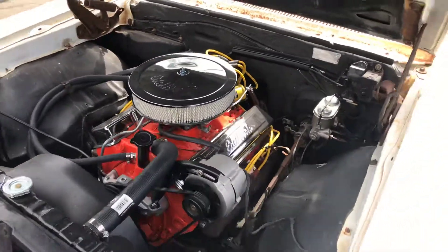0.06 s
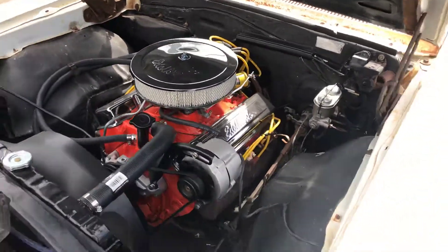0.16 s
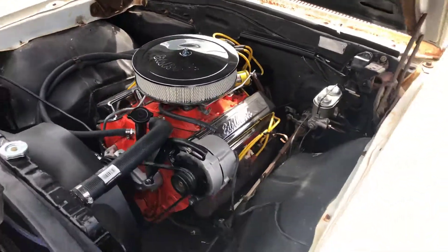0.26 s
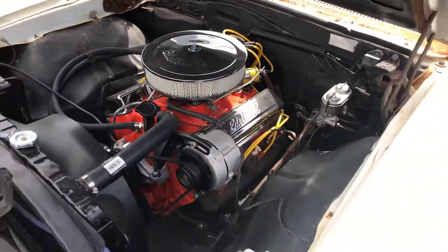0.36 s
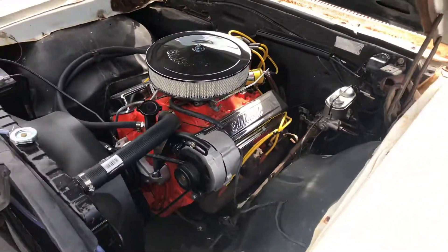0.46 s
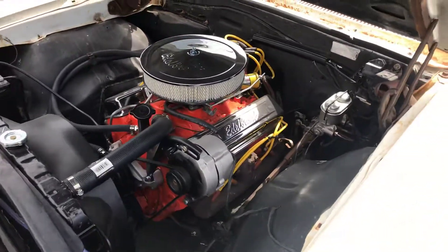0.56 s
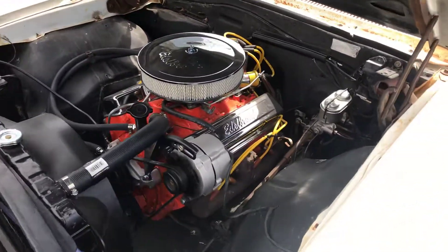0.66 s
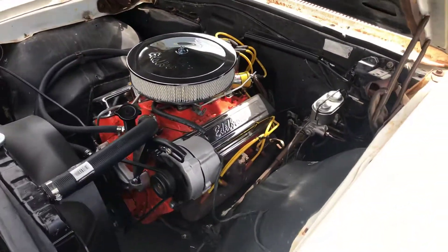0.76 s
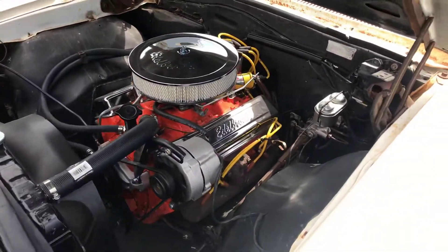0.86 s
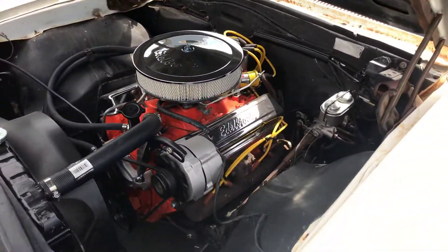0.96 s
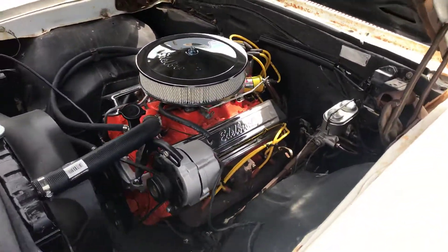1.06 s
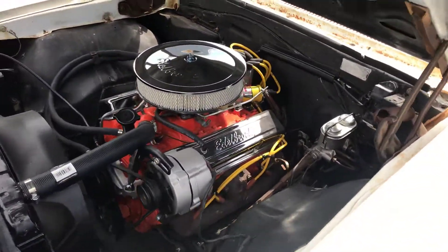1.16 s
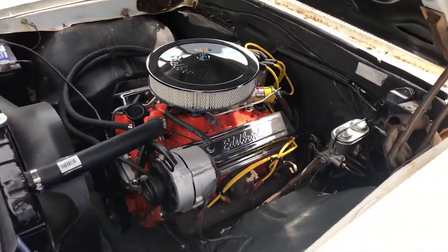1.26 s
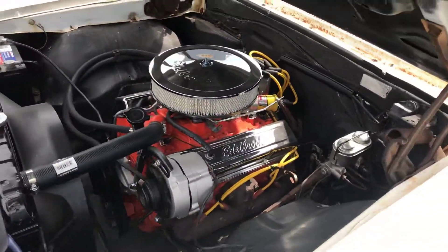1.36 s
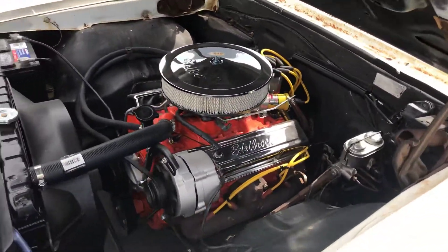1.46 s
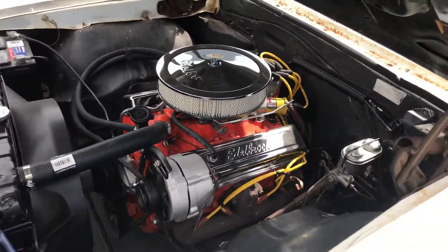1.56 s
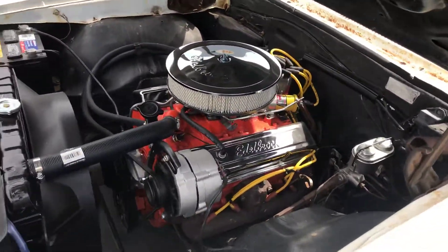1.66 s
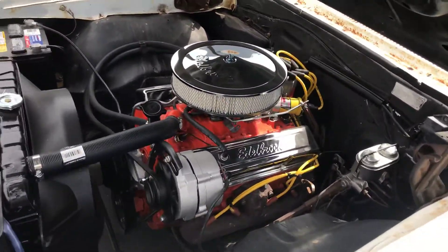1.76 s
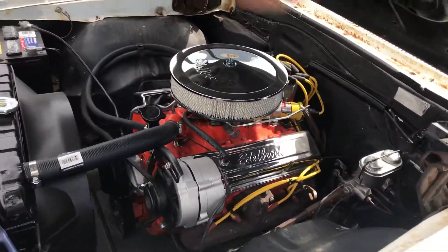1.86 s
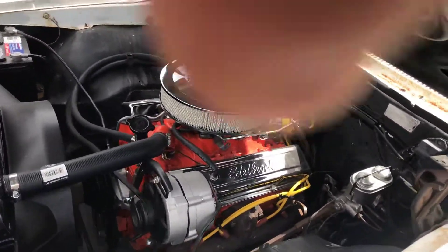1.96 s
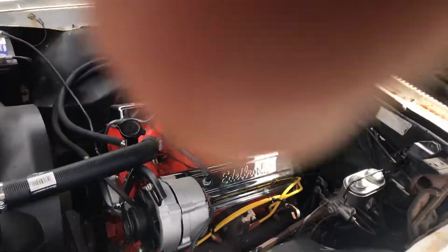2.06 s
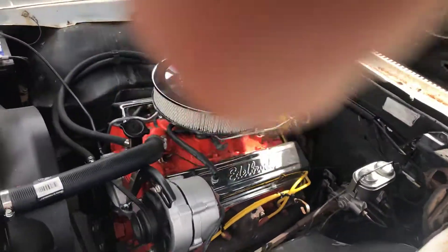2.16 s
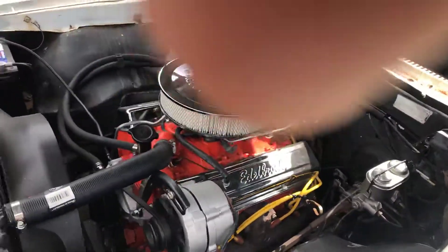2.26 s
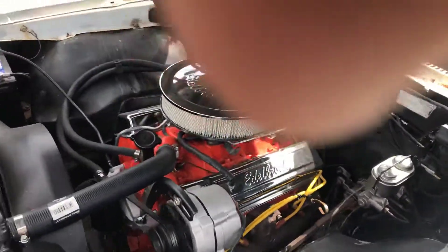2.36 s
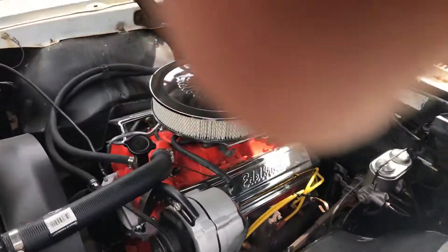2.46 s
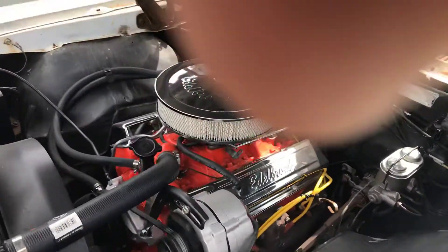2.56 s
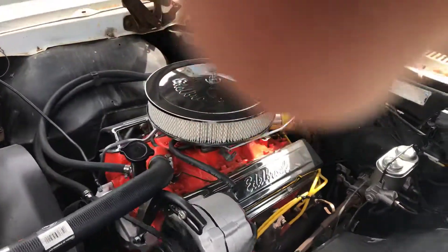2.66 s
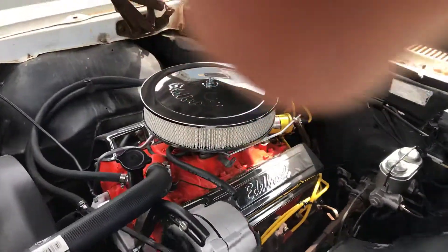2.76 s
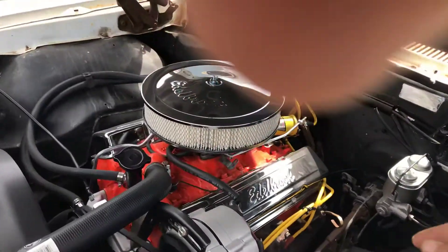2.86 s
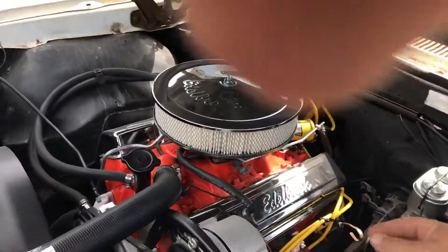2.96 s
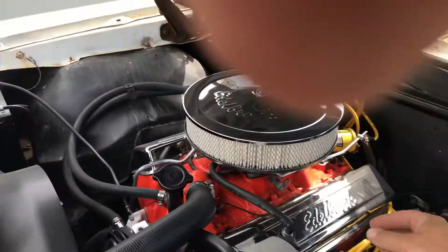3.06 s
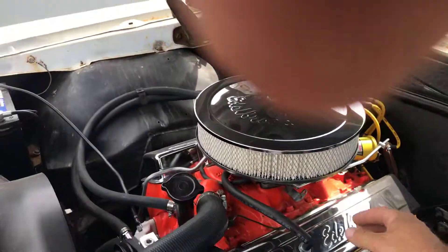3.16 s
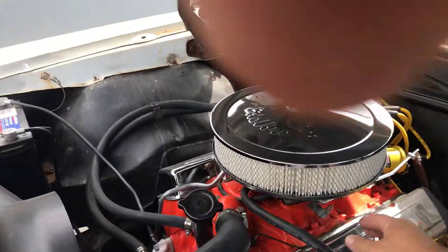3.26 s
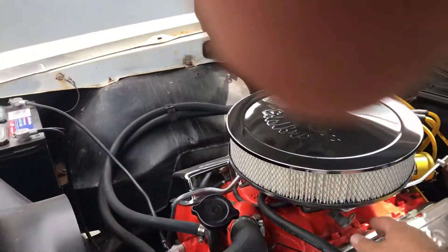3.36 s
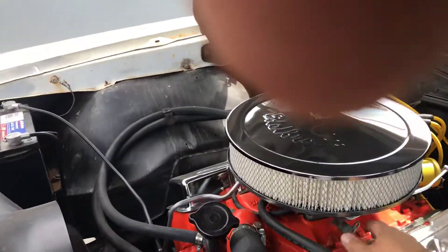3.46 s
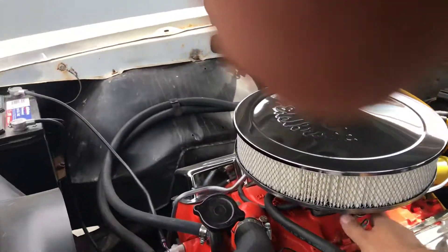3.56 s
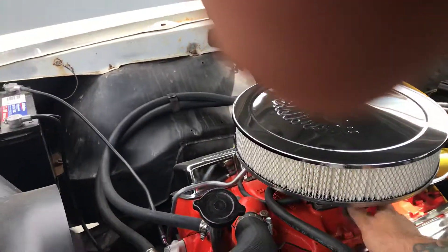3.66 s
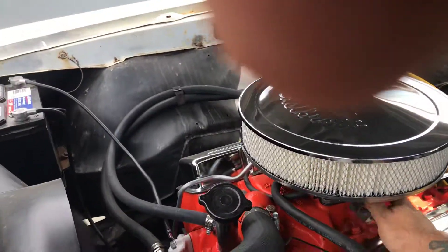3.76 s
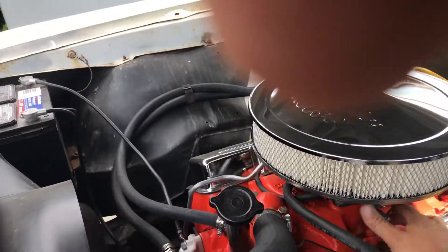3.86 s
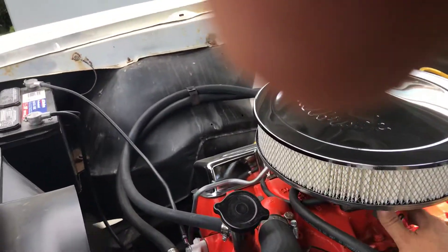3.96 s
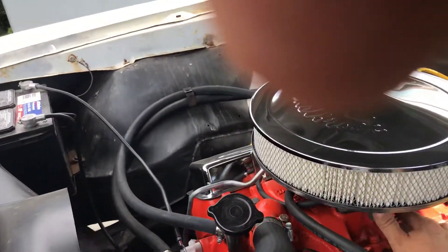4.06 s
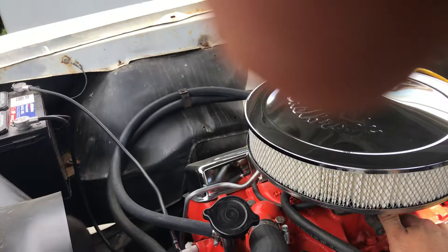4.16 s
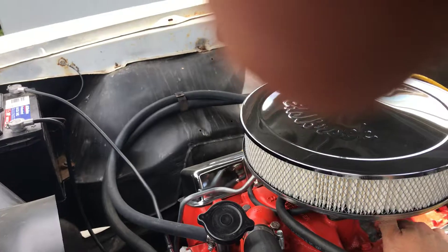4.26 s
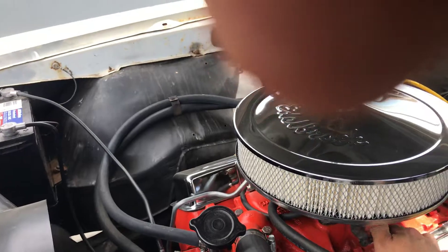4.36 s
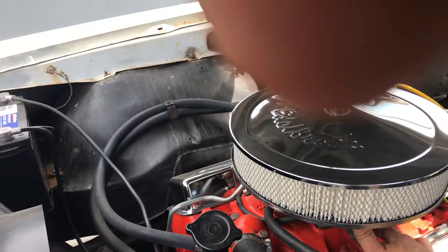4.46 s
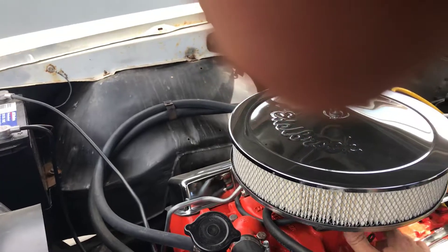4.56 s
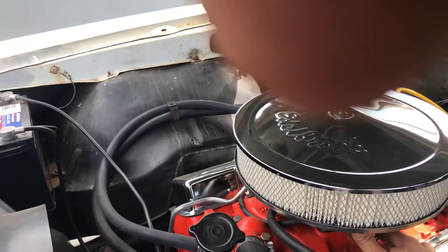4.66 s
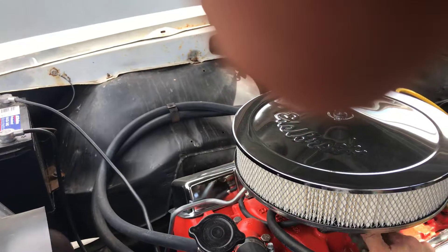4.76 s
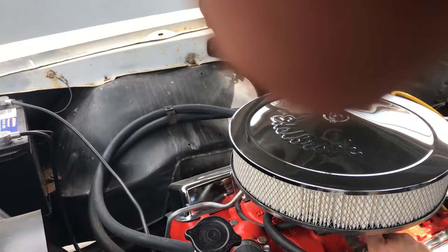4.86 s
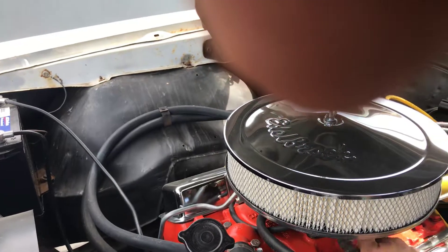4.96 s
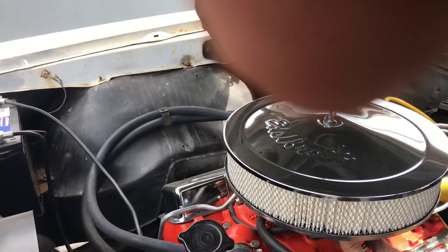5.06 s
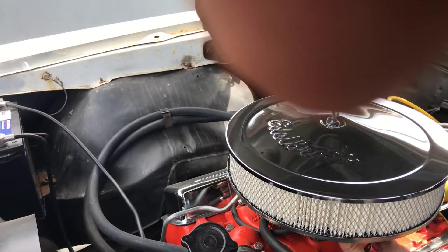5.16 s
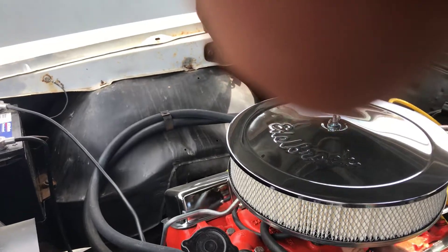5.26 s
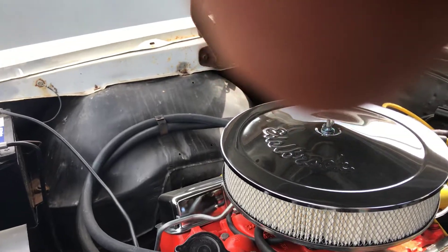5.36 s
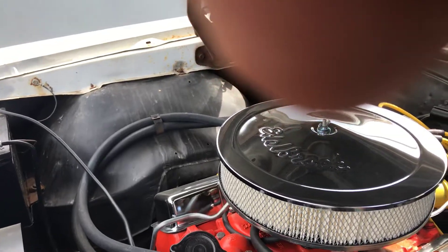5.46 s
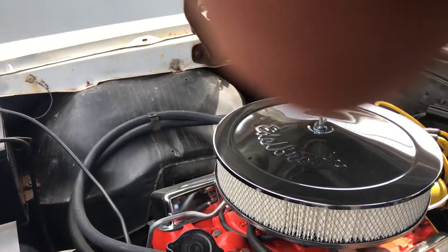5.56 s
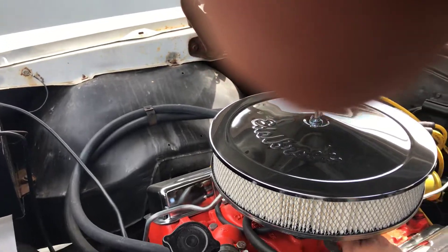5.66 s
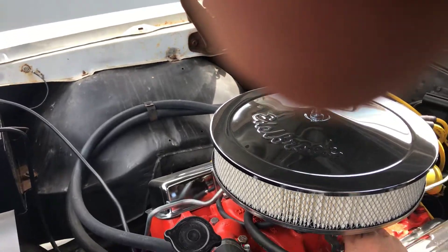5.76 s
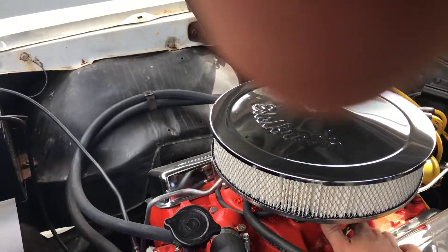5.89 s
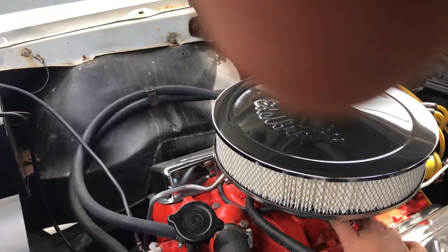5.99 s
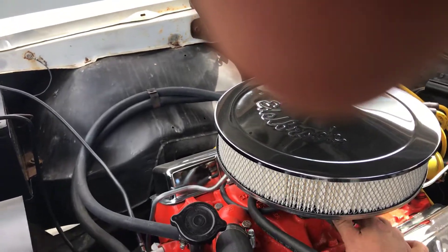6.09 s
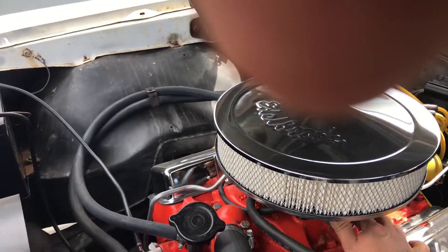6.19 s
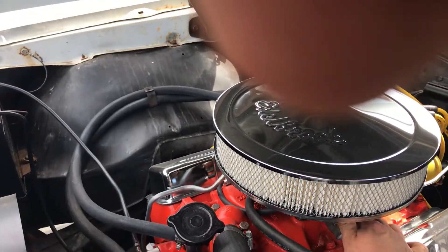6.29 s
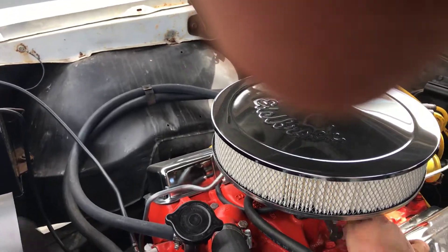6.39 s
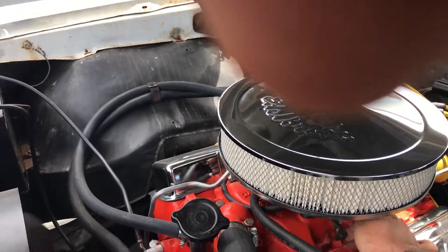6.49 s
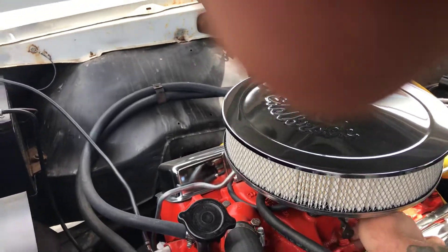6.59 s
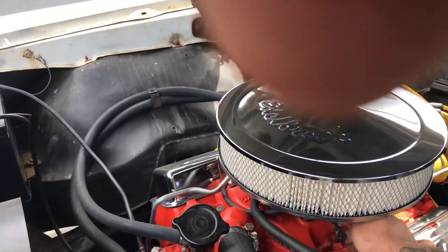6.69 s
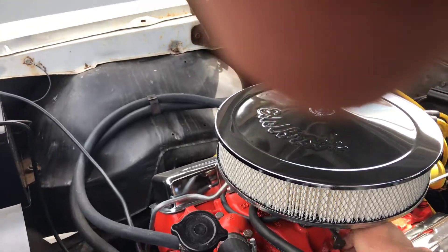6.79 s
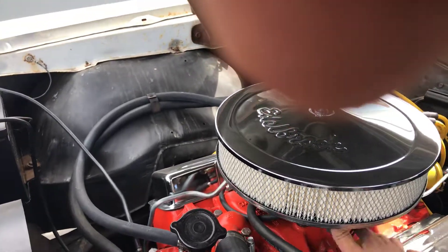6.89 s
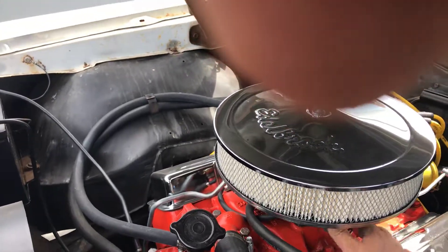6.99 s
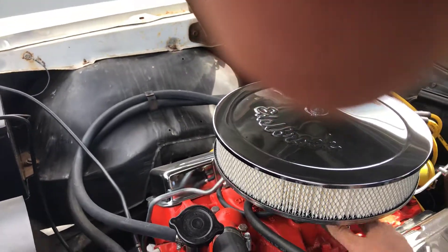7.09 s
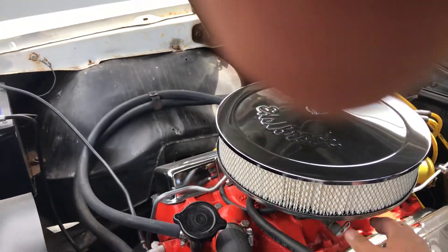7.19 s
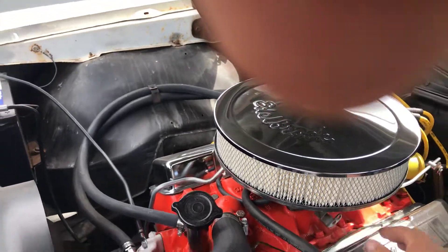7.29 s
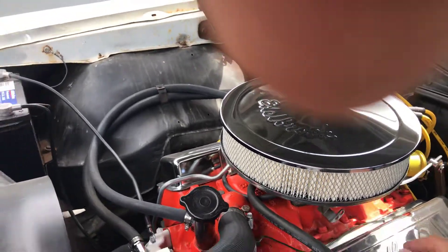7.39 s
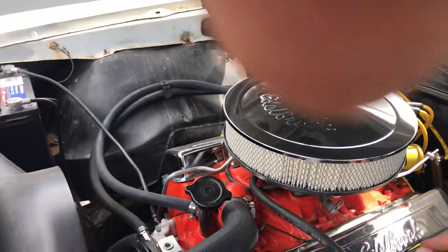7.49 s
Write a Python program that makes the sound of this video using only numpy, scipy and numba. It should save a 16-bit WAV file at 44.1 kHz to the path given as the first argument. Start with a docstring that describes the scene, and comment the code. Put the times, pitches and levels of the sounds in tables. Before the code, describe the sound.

Close, muffled idle of a large uneven engine, a few thumps and rubs on the phone, then rushing intake air and rising growling revs.

```python
"""In an open engine bay a V8 idles, then is blipped by hand at the carburettor; a finger covers the phone's port.
Uneven firing pulses ring exhaust resonances, and the open intake sings in harmonics of the firing rate.
Valve gear, belts and fan are coloured noise beating with crank turns and firings.
Noise gated by the throttle rushes through the air cleaner's resonances, and squeaks are narrow-band noise.
The finger's air pocket lifts one band of the clatter; its knocks are decaying sines and its rubs filtered noise."""
import sys
import numpy as np
from scipy import signal
from scipy.fft import rfft, irfft, next_fast_len
from scipy.io import wavfile
from scipy.ndimage import uniform_filter1d, minimum_filter1d
from numba import njit

SR = 44100
rng = np.random.default_rng(int(sys.argv[2]) if len(sys.argv) > 2 else 0)


def materialize(psi):
    """Save the field psi as 16-bit PCM at rate SR to the path in sys.argv[1].

    A 1-D psi becomes a single channel; in a 2-D psi each row is a channel.
    """
    bounded = np.clip(np.atleast_2d(psi).T, -1, 1)
    quanta = np.round(bounded * 32767).astype(np.int16)
    wavfile.write(sys.argv[1], SR, quanta)


N = 332073

# Spectra, all of columns (frequency [Hz], relative density [dB per Hz]); gains set the overall levels
RUMBLE_SPECTRUM = [(15, -23.5), (30, -13.5), (55, 1), (90, -3.5), (200, -14), (400, -35.5)]
CLATTER_SPECTRUM = [(100, -8), (200, -9), (300, -5), (420, -2), (680, -5.5), (780, -17.5), (920, -5.5),
                    (1150, -25), (2000, -40.5), (4000, -49)]
WHIRR_SPECTRUM = [(470, -14), (800, 1.5), (1160, -1), (1250, -0.5), (1400, -3), (1690, -7.5), (1910, -5),
                  (2190, -5.5), (2610, -12), (2990, -19), (3480, -23.5), (4870, -44), (7340, -46),
                  (13700, -50.5), (15700, -58)]
STEADY_HISS_SPECTRUM = [(2820, -22), (4800, -5.5), (6150, -3.5), (7310, -10), (10300, -14), (13600, -15),
                        (15700, -16)]
SCRATCH_SPECTRUM = [(100, -11), (250, -7.5), (600, 0.5), (1000, -12.5), (2300, -18), (3200, -48),
                    (5000, -53)]
LEAK_SPECTRUM = [(1500, -22), (2800, 6), (4500, -9), (5500, -19), (9000, -29), (15700, -22)]
RUSH_SPECTRUM = [(120, -28.5), (200, -8), (441, -3), (485, -17), (541, -3.5), (848, -3), (1160, -10.5),
                 (1820, -17), (5200, -55.5), (6760, -90), (11400, -120)]
BARK_SPECTRUM = [(50, -20), (90, -1), (170, -3.5), (280, -6.5), (420, -9.5), (700, -29)]
THIN_HISS_SPECTRUM = [(2940, -37.5), (5000, -15), (5640, -3), (6350, 0), (9630, -3.5), (10300, -7.5),
                      (13000, -2), (15700, -6)]

# Engine speed, to which idle hunting is added: (time [s], firing rate [Hz])
ENGINE_SPEED = [(0, 49.5), (4.13, 48.63), (4.2, 52.4), (4.32, 72), (4.51, 96.66), (4.62, 110.7),
                (4.79, 105.9), (4.85, 112.2), (4.94, 134.3), (4.99, 138.8), (5.11, 174.4), (5.35, 144),
                (5.47, 130), (5.63, 126.6), (5.72, 143.7), (5.81, 152.8), (6.0, 138.1), (6.35, 126.5),
                (6.46, 145.6), (6.54, 153.7), (6.65, 194.9), (6.76, 240), (6.89, 292.4), (7.04, 294.2),
                (7.53, 200.8)]
# Levels at the phone, which moves in over the engine:
# (time [s], clatter level [dB], fan whirr level [dB], exhaust level [dB], rumble level [dB])
LEVELS = [(0, -31.5, -39, -32.5, -36.5), (1.4, -30.5, -39.5, -34, -34), (1.8, -29.5, -37.5, -35.5, -36.5),
          (2.74, -30, -37.5, -32.5, -35.5), (3.4, -26, -35, -31.5, -32), (4.13, -26.5, -36.5, -29.5, -41),
          (4.22, -31, -38, -30, -40), (4.42, -19, -36, -32, -25.5), (4.62, -15, -38.5, -26, -22),
          (4.79, -17, -31, -27, -32), (5.2, -14, -29.5, -30, -33), (5.6, -18.5, -45, -28.5, -31),
          (5.95, -20.5, -37.5, -31, -44), (6.05, -19, -38, -32, -41.5), (6.36, -20, -38, -31, -35),
          (6.46, -20, -45.5, -31, -39), (6.75, -23.5, -35, -41, -40), (6.95, -24.5, -30.5, -36.5, -36),
          (7.05, -17, -26, -35.5, -36), (7.53, -23, -31.5, -34, -40)]
# Strength of each firing in the cycle of eight, before random scatter: (level [dB])
CYLINDER_LEVELS = [8.5, -3, 9, -27, 6.5, 2.5, -6.5, 4]
# Exhaust pipe resonances: (frequency [Hz], width before widening by 1.5 [Hz], relative level [dB])
EXHAUST_RESONANCES = [(61, 37, -11.5), (97.4, 23.3, 8.5), (134, 15, -11), (219.6, 42, -8)]
# Lines from banks that fire unevenly: (multiple of firing rate [1], level at full speed [dB])
LOPE_LINES = [(.5, -32.5), (.75, -34.5)]
# Air pocket between finger and port: (time [s], resonance [Hz], width [Hz], gain of the added band [dB])
FINGER_POCKET = [(0, 530, 200, 3), (3.0, 545, 200, 3), (4.5, 588, 95, 8), (7.53, 588, 95, 8)]
# Single heavy firings and intake gulps:
# (time [s], level before the soft start [dB], frequency [Hz], 60 dB decay time [s])
GULPS = [(0.34, -14.5, 56, 0.16), (4.245, -7.5, 170, 0.042), (4.293, -6, 150, 0.043),
         (4.344, -7, 172, 0.085), (4.399, -3, 212, 0.038), (4.45, -12, 180, 0.07)]
# Finger taps on the case: (time [s], snap level [dB], thud frequency [Hz], thud 60 dB decay time [s])
KNOCKS = [(1.241, -21, 304, .03), (1.77, -25, 401, .02), (2.098, -2, 89, 0.038), (2.342, -8.5, 297, 0.059),
          (2.365, -7.5, 371, 0.11), (2.378, -12, 350, 0.062), (2.445, -16.5, 199, 0.052),
          (2.462, -16.5, 298, 0.05)]
# Finger slides over the port: (start [s], length [s], rise [s], level [dB], slip pitch [Hz],
# scratch share of power [0-1], leaking treble relative to the rub [dB])
RUBS = [(1.791, 0.15, 0.051, -23.5, 400, 0.98, -22.5), (2.094, 0.071, 0.0071, -27.5, 303, 0.94, -19.5),
        (2.345, 0.048, 0.0096, -18, 393, 0.99, -34), (2.38, 0.041, 0.03, -19, 390, 0.16, -60),
        (2.434, 0.035, .01, -27, 250, 0.9, -40)]
# Throttle openings: (start [s], opening time [s], length [s], rush level [dB], change while held [dB],
# rush level after closing [dB], thin hiss relative to rush [dB])
THROTTLE_OPENINGS = [(4.13, 0.039, 0.34, -19.5, 1, -24.5, -44.5),
                     (4.789, 0.043, 0.21, -14.5, -1.5, -20, -43), (5.56, 0.093, 0.28, -14, -5.5, -24, -44),
                     (6.332, 0.058, 0.12, -18.5, -0.5, -24, -45.5), (6.742, .09, 0.14, -15.5, -7, -22, -47)]
# Air cleaner housing resonances: (frequency [Hz], width [Hz], level over the direct air noise [dB])
CLEANER_RESONANCES = [(821, 300, -1), (1040, 70, 3), (1386, 65, 8), (1557, 58, 6), (1854, 47, 10),
                      (2050, 275, 12), (2428, 110, 14), (3120, 53, -2)]
# Belt and throttle linkage squeaks: (time [s], length [s], frequency [Hz], level [dB])
SQUEAKS = [(4.196, .025, 14600, -66), (4.44, 0.026, 13400, -70), (4.465, .025, 15200, -67),
           (6.363, 0.036, 2450, -32), (6.391, 0.018, 2537, -35), (6.755, 0.15, 2857, -44),
           (6.893, 0.0258, 2830, -35), (6.908, 0.024, 2636, -32), (6.922, 0.037, 2850, -37)]
# Intake response to overtones, before each harmonic's offset: (frequency [Hz], level over the note [dB])
INTAKE_RESPONSE = [(200, -20), (300, -19), (390, -22), (450, -10), (500, -7), (560, 1), (630, 5), (740, 1),
                   (830, 8), (950, -2), (1150, -20)]
# Engine pulls that make the intake sing: (start [s], rise [s], length [s], note level [dB],
# change while held [dB], extra clatter [dB])
PULLS = [(4.27, .04, .1, -24, -2, -1), (4.463, 0.038, 0.12, -12, -11, -1),
         (4.815, 0.085, 0.17, -17.5, 5, 6), (5.647, 0.044, 0.199, -15, 1.5, 6),
         (6.384, .04, 0.473, -11, -7, 7), (6.869, .02, 0.094, -33, -4, 3)]

HUNT_HZ = 0.602  # spread of the idle's hunting
RUMBLE_SWAY_DB = -0.5  # scale of a slow random swell
STEADY_HISS_DB = -72.5
CLOSE_S, RUSH_FADE_DB_S, HISS_FADE_DB_S = 0.033, 10, 11  # closing time [s], fades when shut [dB/s]
JET_DB, JET_S = 2.5, .07  # flare of the thin hiss around full opening [dB], its time constant [s]
BARK_DB = -8  # relative to the air rush
COAST_DB, PULL_RELEASE_S = -39, 0.049  # intake note off throttle at speed [dB], release [s]
TOP_HZ = 15750  # upper band edge


def undb(db):
    """Decibel law: 20 dB is a tenfold amplitude."""
    return 10 ** (np.asarray(db) / 20)


def unit(x):
    """Normalisation to unit root-mean-square amplitude."""
    return x / np.sqrt(np.mean(x ** 2))


def colour(x, table):
    """Spectral shaping: multiply the Fourier transform by a curve linear in dB over log frequency."""
    hz, db = np.transpose(table)
    n = next_fast_len(len(x))
    f = np.maximum(np.arange(n // 2 + 1) * SR / n, 1)
    gain_db = np.interp(np.log(f), np.log(hz), db, left=-90, right=-90)
    return irfft(rfft(x, n) * undb(gain_db), n)[:len(x)]


def walk(rate):
    """Smoothed random fluctuation: values held 1 / rate s and averaged twice, with a spread near 1."""
    k = int(SR / rate)
    steps = np.repeat(rng.standard_normal(N // k + 1), k)
    return 1.39 * uniform_filter1d(uniform_filter1d(steps, k), k)[:N]


@njit
def svf(x, hz, width):
    """Second-order resonance: a state-variable band-pass with moving centre and width, unit peak gain."""
    y, b, l = np.empty(len(x)), 0., 0.
    for i in range(len(x)):
        g, k = np.tan(np.pi * hz[i] / SR), width[i] / hz[i]
        v = (b + g * (x[i] - l)) / (1 + g * (g + k))
        b, l, y[i] = 2 * v - b, l + 2 * g * v, k * v
    return y


def band(x, hz, width):
    """Fixed resonance: a band-pass of constant centre and width."""
    return svf(x, np.full(len(x), 1. * hz), np.full(len(x), 1. * width))


def steady(x, seconds=0.083):
    """Envelope normalisation: division by the running r.m.s. evens out slow level changes."""
    return x / np.sqrt(uniform_filter1d(x ** 2, int(seconds * SR)) + 1e-18)


def play(table):
    """Linear interpolation: the columns of a table become curves in time."""
    s, *columns = np.transpose(table)
    return [np.interp(np.arange(N) / SR, s, c) for c in columns]


def held(t, s, attack, length, release):
    """Trapezoidal envelope: gain 0-1 that rises, holds and falls, and the share of the length gone by."""
    gain = np.clip(np.minimum((t - s) / attack, 1 + (s + length - t) / release), 0, 1)
    return gain, np.clip((t - s) / length, 0, 1)


def gated(firings, table, firing_db, flicker_db):
    """Amplitude modulation: noise beats with the firings and flickers at random before colouring."""
    beat_db = firing_db * np.cos(2 * np.pi * firings) + flicker_db * walk(30)
    return steady(colour(undb(beat_db) * rng.standard_normal(N), table))


def engine_speed(t):
    """Speed fluctuation: the firing rate [Hz] hunts at random until the throttle first opens."""
    idling = t < THROTTLE_OPENINGS[0][0]
    return play(ENGINE_SPEED)[0] + HUNT_HZ * walk(3) * idling


def exhaust(firings):
    """Impulse excitation: one pulse a firing, strong or weak by cylinder, rings the pipe resonances."""
    count = np.floor(firings).astype(int)
    at = np.flatnonzero(np.diff(count)) + 1
    scatter_db = 2.5 * rng.standard_normal(N // 50)
    pulses = np.zeros(N)
    pulses[at] = undb(np.array(CYLINDER_LEVELS)[count[at] % 8] + scatter_db[count[at]])
    pipes = np.zeros(N)
    for k, (hz, width, db) in enumerate(EXHAUST_RESONANCES):
        ring = band(band(pulses, hz, 1.5 * width), hz, 1.5 * width)
        pipes += (-1) ** k * undb(db) * ring  # alternate polarity
    return steady(pipes, seconds=0.16)


def lope(firings, hz, full_hz=280, octave_db=12):
    """Subharmonics: uneven banks give lines under the firing rate that waver and grow with speed."""
    out = 0
    for multiple, db in LOPE_LINES:
        waver_db, drift = 4.5 * walk(30), .8 * walk(15)  # drift of phase in radians
        gain = undb(db + octave_db * np.log2(hz / full_hz) + waver_db)
        out = out + gain * np.cos(2 * np.pi * multiple * firings + drift)
    return np.sqrt(2) * out


def rumble(firings):
    """Modulated low-frequency noise, beating slightly with the firings."""
    return gated(firings, RUMBLE_SPECTRUM, firing_db=0.5, flicker_db=-3.0)


def pocket(x):
    """Cavity resonance: the air trapped under the finger lifts one band."""
    hz, width, db = play(FINGER_POCKET)
    return x + undb(db) * svf(x, hz, width)


def clatter(firings, firing_db=1.5, flicker_db=1.0):
    """Periodic modulation: noise of valve gear, belts and fan beats with crank turns and firings."""
    turn_db = 1.6 * np.cos(2 * np.pi * firings / 4)  # four firings a crank turn
    beat_db = turn_db + firing_db * np.cos(2 * np.pi * firings) + flicker_db * walk(45)
    noise = colour(undb(beat_db) * rng.standard_normal(N), CLATTER_SPECTRUM)
    return steady(pocket(noise))


def whirr(firings):
    """Modulated broadband noise: the fan's whirr, beating slightly with the firings."""
    return gated(firings, WHIRR_SPECTRUM, firing_db=0.5, flicker_db=1.5)


def steady_hiss():
    """Stationary noise: the phone's faint steady hiss."""
    return undb(STEADY_HISS_DB) * unit(colour(rng.standard_normal(N), STEADY_HISS_SPECTRUM))


def gulps(rise_s=0.0024):
    """Damped oscillation: low sines with a soft start and exponential decay."""
    out, t = np.zeros(N), np.arange(SR // 4) / SR
    for s, db, hz, t60 in GULPS:
        i = int(s * SR)
        envelope = (1 - np.exp(-t / rise_s)) * 1000 ** (-t / t60)
        out[i:i + len(t)] += undb(db) * envelope * np.sin(2 * np.pi * hz * t)
    return out


def knocks(snap_hz=620, crack_hz=1800, crack_db=-3, skin_hz=2900):
    """Impact response: a crack, a snap in the pocket and a case thud decay; soft skin is a low-pass."""
    out, t = np.zeros(N), np.arange(SR // 5) / SR
    snap = np.sin(2 * np.pi * snap_hz * t) * 1000 ** (-t / .014)
    crack = np.sin(2 * np.pi * crack_hz * t) * 1000 ** (-t / .005)
    for s, db, hz, t60 in KNOCKS:
        i = int(s * SR)
        thud = 0.59 * np.sin(2 * np.pi * hz * t) * 1000 ** (-t / t60)
        out[i:i + len(t)] += undb(db) * (snap - undb(crack_db) * crack - thud)
    return signal.sosfilt(signal.butter(4, skin_hz, fs=SR, output="sos"), out)


def rubs(end_s=0.019, slip_width=70):
    """Frictional noise: skin slips with a rough pitch and scratches, while treble leaks past the finger."""
    out, t = np.zeros(N), np.arange(N) / SR
    scratch = unit(colour(rng.standard_normal(N), SCRATCH_SPECTRUM))
    grain = rng.standard_normal(N)
    leak = unit(colour(rng.standard_normal(N), LEAK_SPECTRUM))
    for s, length, rise, db, hz, share, leak_db in RUBS:
        press = np.clip(np.minimum((t - s) / rise, (s + length - t) / end_s), 0, 1)
        share = np.clip(share, 0, 1)
        slip = band(grain, hz, slip_width)
        slip = unit(band(band(slip, hz, 3 * slip_width), hz, 3 * slip_width))
        skin = np.sqrt(1 - share) * slip + np.sqrt(share) * scratch
        out += press * undb(db) * (skin + undb(leak_db) * leak)
    return out * undb(1.6 * walk(90))  # the grip is uneven


def throttle(t):
    """Flow control: rush and hiss gains rise as plates open, step down as they close, then fade slowly."""
    air, hiss = 0, 0
    for s, opening, length, db, change_db, after_db, hiss_db in THROTTLE_OPENINGS:
        gain, gone = held(t, s, opening, length, CLOSE_S)
        shut_s = np.maximum(t - s - length, 0)
        opened = np.clip((t - s) / opening, 0, 1)
        wide = gain * undb(db + change_db * gone)
        air_tail = opened * undb(after_db - RUSH_FADE_DB_S * shut_s)
        air = np.maximum(air, np.maximum(wide, air_tail))
        flare = undb(JET_DB * np.exp(-np.abs(t - s - opening) / JET_S))
        hiss_tail = opened * undb(after_db - HISS_FADE_DB_S * shut_s)
        hiss = np.maximum(hiss, undb(hiss_db) * np.maximum(wide * flare, hiss_tail))
    return air, hiss


def rush(firings):
    """Flow noise and resonance: air drawn through the carburettor rings the air cleaner housing."""
    air = gated(firings, RUSH_SPECTRUM, firing_db=1.0, flicker_db=-2.6)
    housing = sum(undb(db) * band(air, hz, width) for hz, width, db in CLEANER_RESONANCES)
    return unit(air + housing)


def bark(firings):
    """Modulated low-frequency noise: the roar of the open throttle."""
    return undb(BARK_DB) * gated(firings, BARK_SPECTRUM, firing_db=1.0, flicker_db=-6)


def thin_hiss(firings):
    """Modulated treble noise: the thin hiss of air past the throttle plates."""
    return gated(firings, THIN_HISS_SPECTRUM, firing_db=1.0, flicker_db=-1.0)


def squeaks():
    """Narrow-band noise: whistles waver within a small bandwidth, swell and fade."""
    out, t, noise = np.zeros(N), np.arange(N) / SR, rng.standard_normal(N)
    for s, length, hz, db in SQUEAKS:
        swell = np.sin(np.pi * np.clip((t - s) / length, 0, 1))
        width = hz / 30
        whistle = steady(band(band(noise, hz, width), hz, width), seconds=0.026)
        out += undb(db) * swell * whistle
    return out


def pulls(t, hz):
    """Load dependence: the intake note's gain and the extra clatter [dB] follow the engine's pulls."""
    note = undb(COAST_DB) * np.clip((hz - 60) / 40, 0, 1)
    extra_db = 0
    for s, rise, length, db, change_db, clatter_db in PULLS:
        gain, gone = held(t, s, rise, length, PULL_RELEASE_S)
        note = np.maximum(note, gain ** 2 * undb(db + change_db * gone))
        extra_db = extra_db + clatter_db * gain
    return note, extra_db


def intake(firings, hz):
    """Harmonic synthesis: suction pulses sing on the firing rate, throbbing once a crank turn."""
    f, db = np.transpose(INTAKE_RESPONSE)
    wobble_db = np.interp(hz, [100, 140], [2.2, .8])  # rougher at low speed
    note = undb(wobble_db * walk(40)) * np.sin(2 * np.pi * firings)
    for k, offset_db in [(2, 8), (3, -1), (4, -13)]:  # harmonic number, offset [dB]
        response_db = np.interp(np.log(k * hz), np.log(f), db)
        gain = undb(offset_db + response_db + 1.5 * walk(40))
        note = note + gain * np.sin(2 * np.pi * k * firings + k * k)
    throb = 1 + .15 * np.cos(2 * np.pi * firings / 4)
    return np.sqrt(2) * note * throb


def scene():
    """Superposition: the engine's layers share one firing phase, and the other sounds add to them."""
    t = np.arange(N) / SR
    hz = engine_speed(t)
    firings = np.cumsum(hz) / SR  # firings so far, the phase in cycles
    clatter_db, whirr_db, exhaust_db, rumble_db = play(LEVELS)
    rumble_db = rumble_db + RUMBLE_SWAY_DB * walk(4)
    note, extra_db = pulls(t, hz)
    air, thin = throttle(t)
    engine = undb(exhaust_db) * exhaust(firings) + lope(firings, hz)
    engine += undb(rumble_db) * rumble(firings)
    engine += undb(clatter_db + extra_db) * clatter(firings)
    engine += undb(whirr_db) * whirr(firings)
    engine += air * (rush(firings) + bark(firings)) + thin * thin_hiss(firings)
    engine += note * intake(firings, hz)
    return (engine + steady_hiss() + gulps() + knocks() + rubs() + squeaks())[None]


def record(dry):
    """Band limiting and peak limiting: the phone drops deep bass, eases loud peaks and cuts the top."""
    x = signal.sosfilt(signal.butter(2, 40, "high", fs=SR, output="sos"), dry)
    room_left = minimum_filter1d(np.minimum(1, .99 / (np.abs(x) + 1e-9)), 441)  # 10 ms window
    x = x * uniform_filter1d(uniform_filter1d(room_left, 220), 220)
    x = x * np.minimum(1, np.arange(N)[::-1] / 88)  # a 2 ms fade at the end
    return signal.sosfilt(signal.ellip(10, .2, 80, TOP_HZ, fs=SR, output="sos"), x)


dry = scene()
out = record(dry)
materialize(out)
```